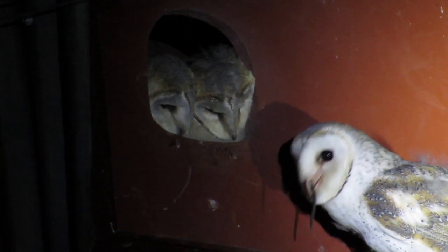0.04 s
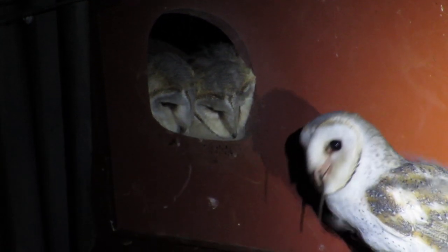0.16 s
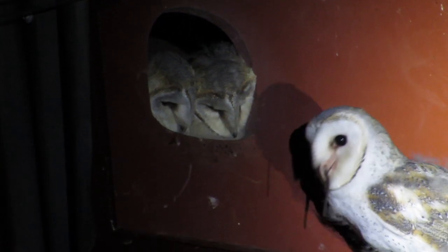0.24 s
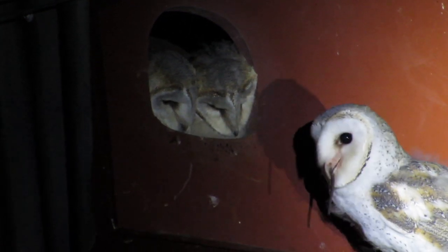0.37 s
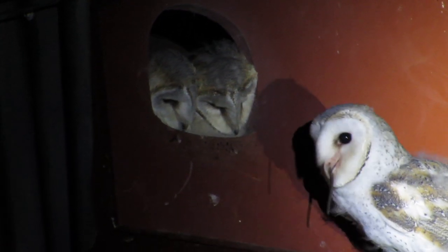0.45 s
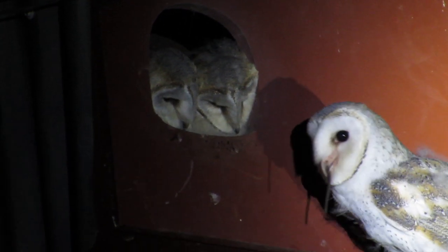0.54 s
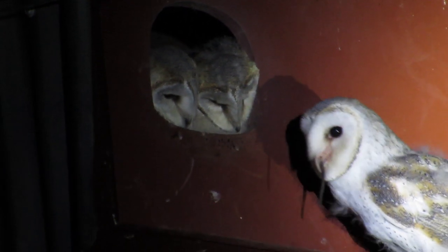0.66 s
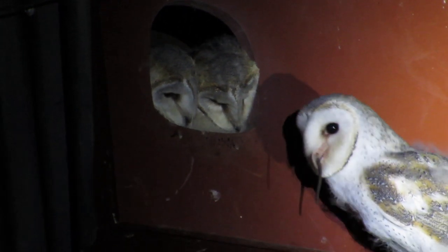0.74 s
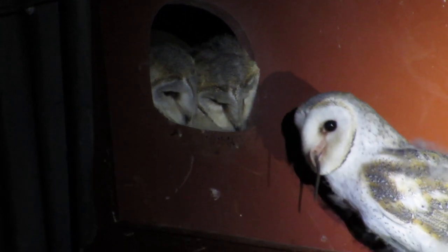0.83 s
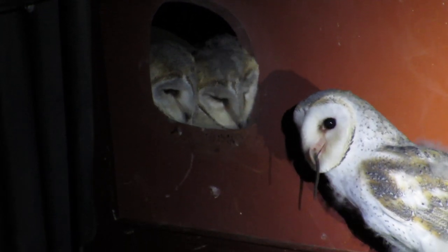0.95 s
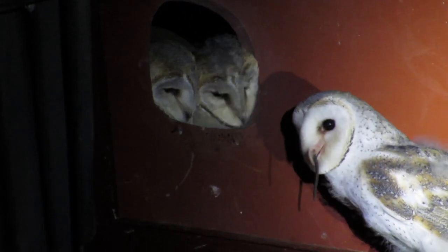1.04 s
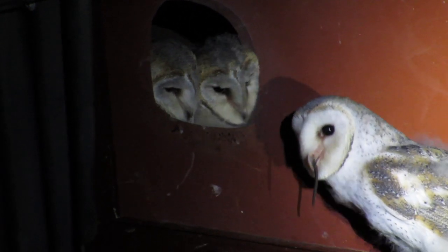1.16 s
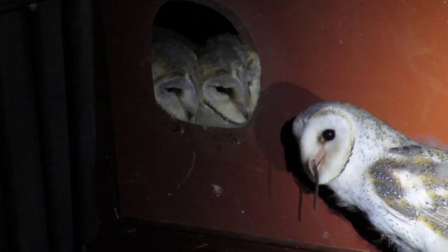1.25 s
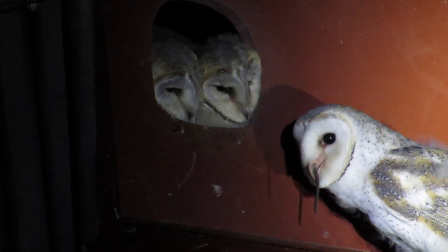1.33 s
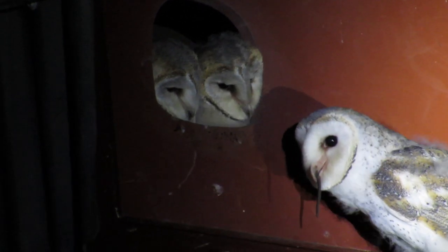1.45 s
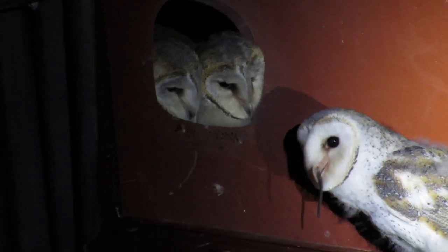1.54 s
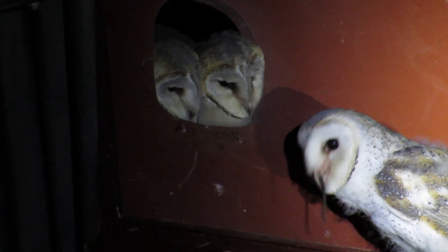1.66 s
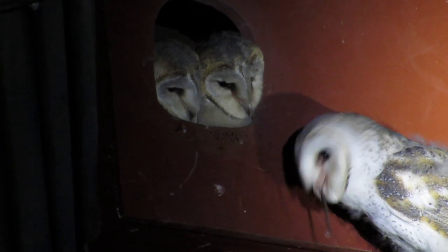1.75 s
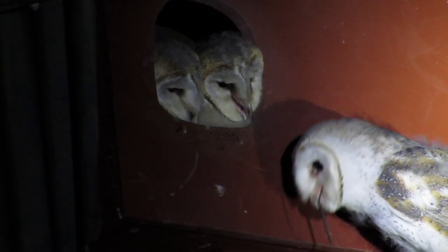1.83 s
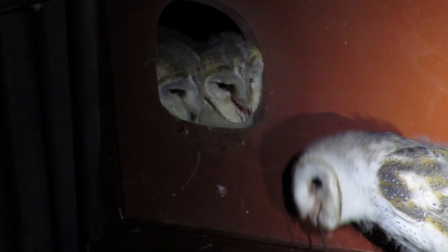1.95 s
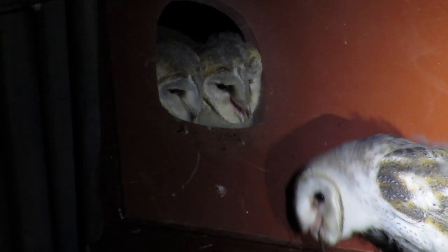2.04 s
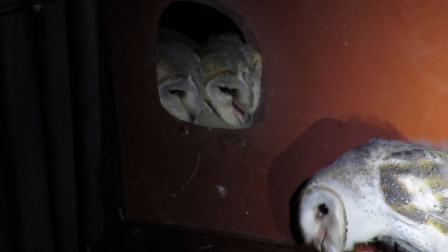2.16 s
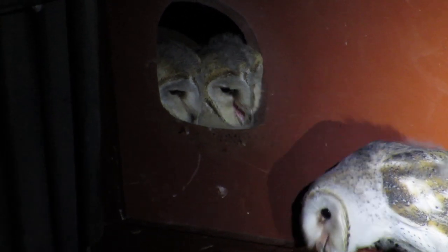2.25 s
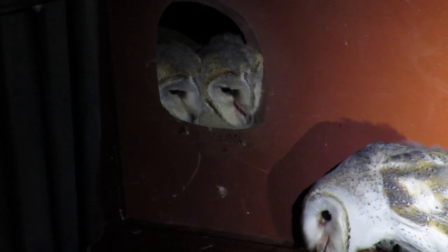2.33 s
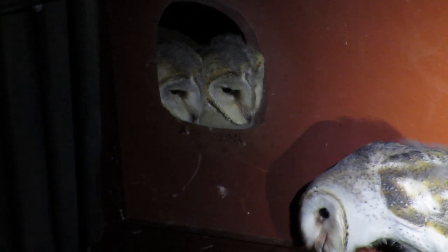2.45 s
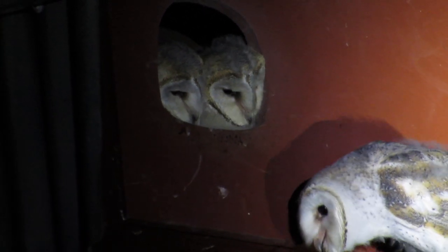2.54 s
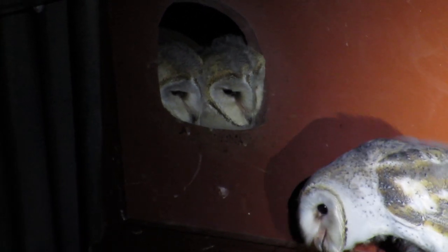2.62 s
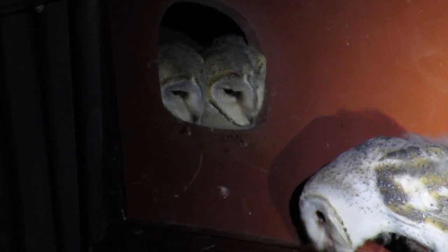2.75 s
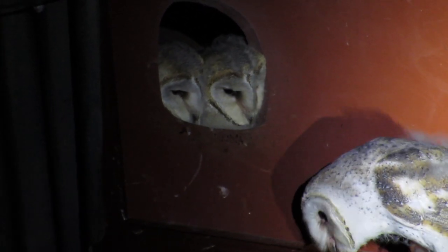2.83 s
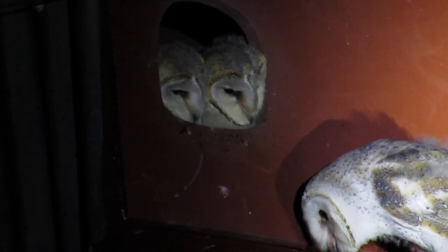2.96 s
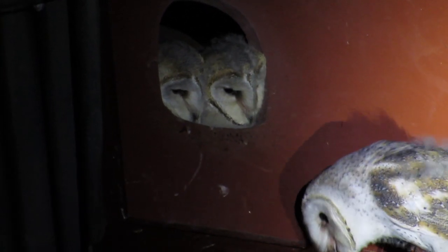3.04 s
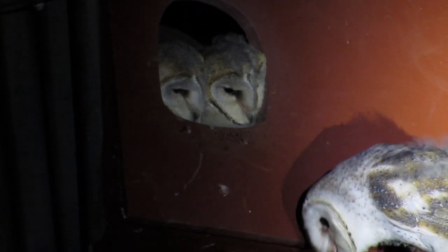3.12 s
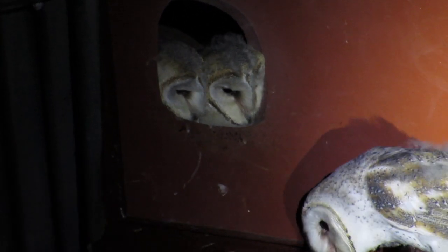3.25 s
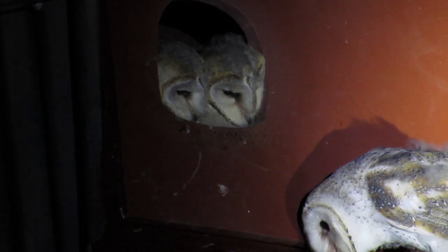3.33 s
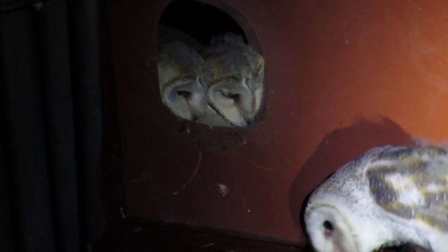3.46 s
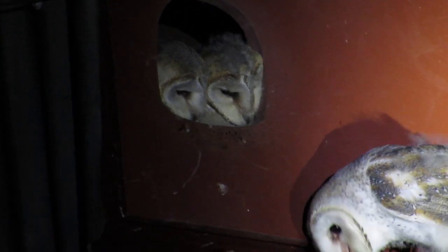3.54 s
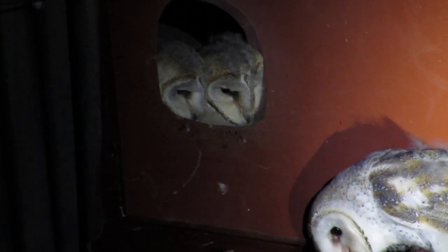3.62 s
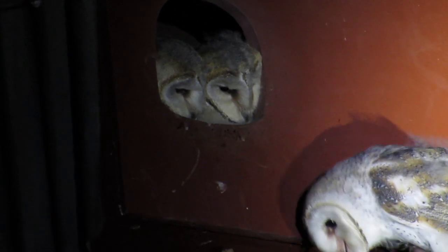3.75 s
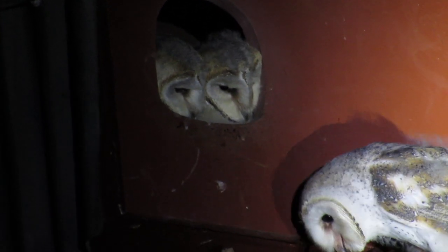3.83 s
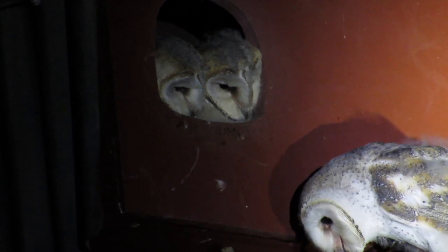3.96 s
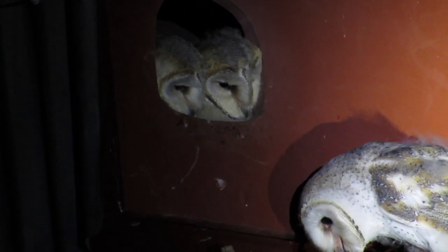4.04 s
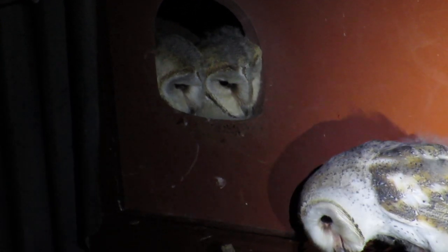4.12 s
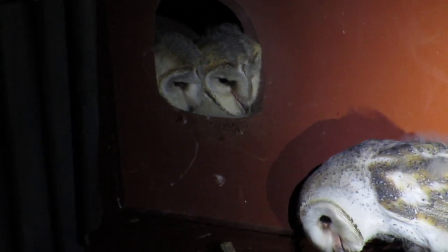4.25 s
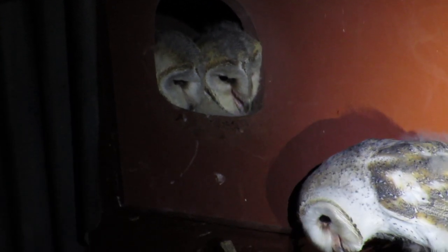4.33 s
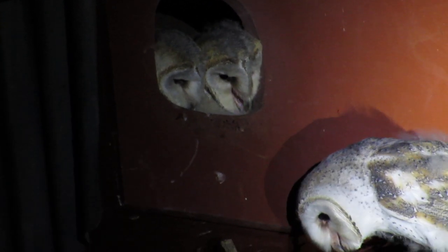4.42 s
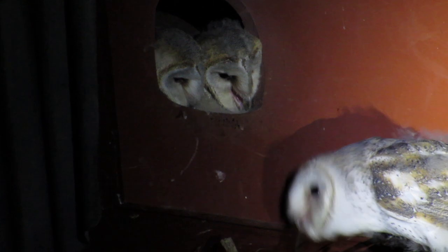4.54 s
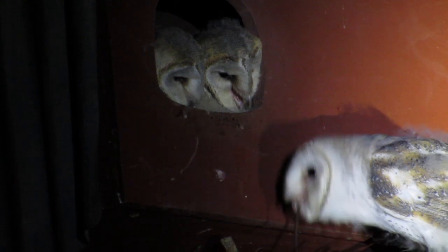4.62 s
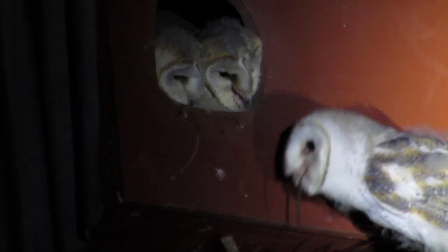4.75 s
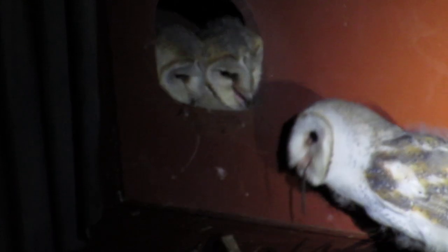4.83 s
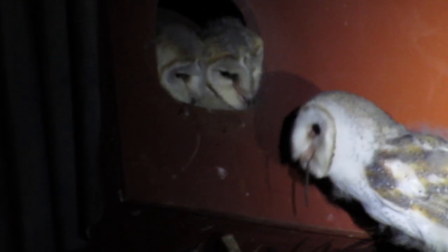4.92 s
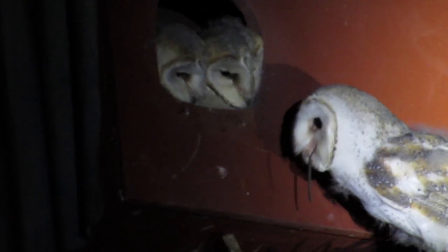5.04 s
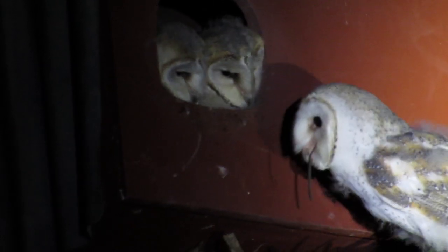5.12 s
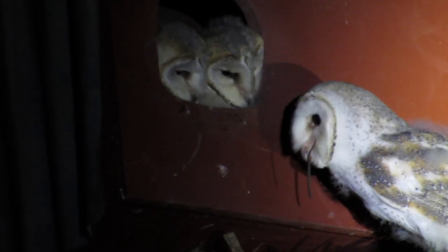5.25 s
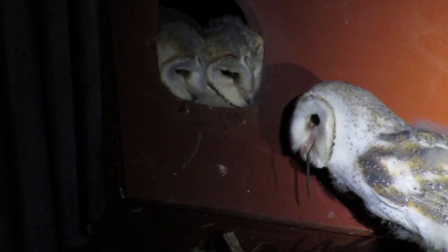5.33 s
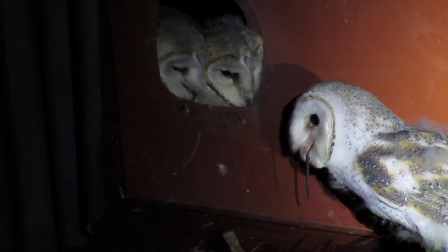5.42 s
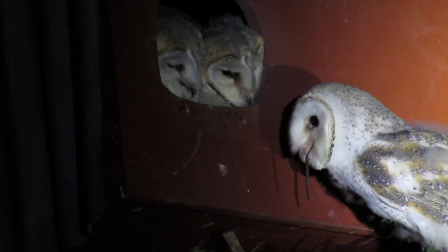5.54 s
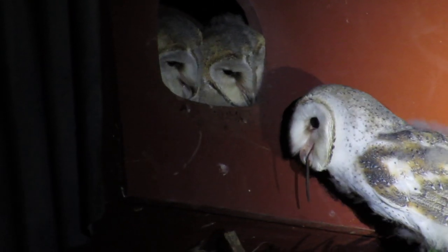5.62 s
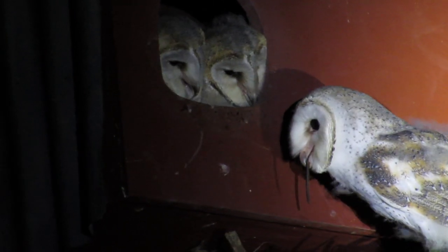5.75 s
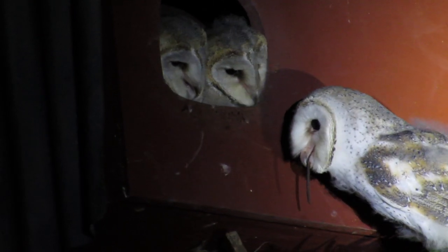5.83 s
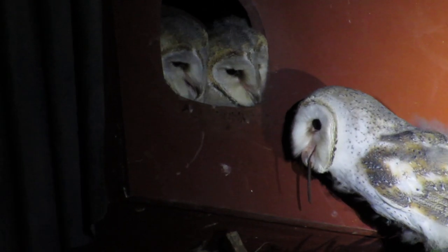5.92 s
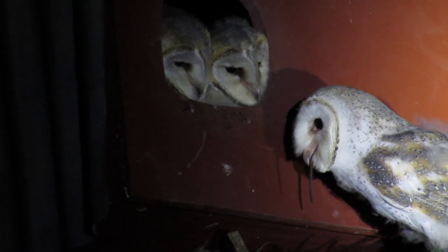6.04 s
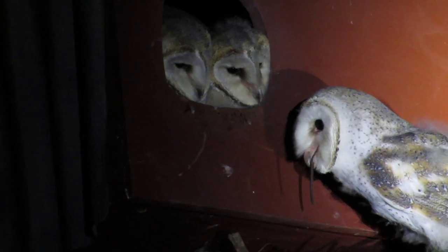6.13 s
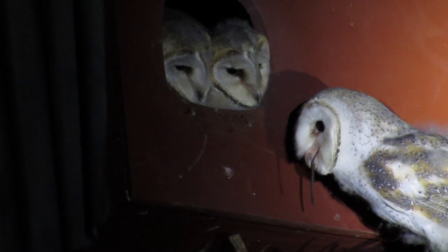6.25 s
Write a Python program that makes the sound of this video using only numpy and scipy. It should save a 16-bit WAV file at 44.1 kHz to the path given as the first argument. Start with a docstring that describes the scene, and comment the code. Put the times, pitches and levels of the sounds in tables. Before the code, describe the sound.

A young barn owl gives two long, harsh, hissing begging screeches from a wooden nest box while crickets chirp steadily through the quiet night.

```python
"""A young barn owl gives two long begging screeches from the hole of a wooden nest box at night.
Each is turbulent air hissing through a throat whose resonances rise as the beak opens.
Crickets chirp as sagging tones and an insect trills thinly, over low rumble and faint hiss.
The box thumps softly, as wavering low tones, and ticks, as decaying bursts, while the birds shift about."""
import sys
import numpy as np
from scipy import signal
from scipy.fft import rfft, irfft
from scipy.io import wavfile

SR = 44100
rng = np.random.default_rng(int(sys.argv[2]) if len(sys.argv) > 2 else 0)


def unload_wav(signal):
    """Save mono or channel-first audio to the path in sys.argv[1] as 16-bit WAV at rate SR, clipped to [-1, 1]."""
    wavfile.write(
        sys.argv[1],
        SR,
        np.round(np.clip(np.atleast_2d(signal).T, -1, 1) * 32767).astype(np.int16),
    )


N = 276948
TIME = np.arange(N) / SR

# Reverberation of the yard. Each row: frequency in Hz, time to decay by 60 dB in seconds.
YARD_T60 = [(300, 0.287), (2500, 0.44), (4000, 0.15), (8000, 0.14), (14000, 0.107)]

# Effort is one arch: a quick start, a long swell to its crest (share of the length),
# a shorter fade, a sharp stop.
ATTACK_S, SWELL_DB, CREST, FADE_DB, STOP_DB_PER_S = 0.023, 19, 0.64, 9, 527
# The beak opens smoothly just after the start, droops (share of the opening) as effort fades,
# then snaps shut.
BEAK_WAIT_S, BEAK_OPEN_S, BEAK_DROOP, BEAK_SHUT_S = 0.017, 0.38, 0.13, 0.048
OVERTONE_DB = -19  # second harmonic of a cricket's stroke, relative to the first
STROKE_S, FULL_PACE_PER_S = 0.033, 28  # length of one near-cricket stroke at full pace
STRETCH = 0.78  # slower strokes last longer, by this power of the pace
# A bout reaches its level within a few strokes; each stroke differs a little.
WARM_UP_STROKES, UNEVEN_DB = 1.35, 0.94
# Each trill run fades in, grows steadily louder and fades out.
TRILL_S, TRILL_FADE_S, TRILL_SWELL_DB_PER_S = 1.8, 0.087, 4
EDGE_HZ = 15400  # upper band limit


def gain_of(db):
    """Level law: decibels to amplitude ratio."""
    return 10 ** (np.asarray(db) / 20)


def evened(x):
    """Normalisation of power: scales to rms 1."""
    return x / np.sqrt(np.mean(x ** 2) + 1e-20)


def read(points, hz):
    """Linear interpolation of a table over a log-frequency axis."""
    f, value = np.transpose(points)
    return np.interp(np.log(hz + 1), np.log(f + 1), value)


def add(mix, s, sound):
    """Superposition: adds a sound to the mix from time s."""
    part = mix[max(round(s * SR), 0):][:len(sound)]
    part += sound[:len(part)]


def coloured(x, spectrum):
    """Linear filtering: multiplies the spectrum by a table of (Hz, dB)."""
    hz = np.fft.rfftfreq(N, 1 / SR)
    return irfft(rfft(x) * gain_of(read(spectrum, hz)), N)


def wobble(hz, size=N):
    """Low-pass noise: random motion of rms 1, no faster than about hz."""
    f = np.fft.rfftfreq(size, 1 / SR)
    spectrum = rfft(rng.standard_normal(size)) / (1 + (f / hz) ** 4)
    return evened(irfft(spectrum, size))


def placed(x, lag, balance_db):
    """Time and level differences: the left microphone hears lag seconds later, balance_db louder."""
    delay = np.exp(-2j * np.pi * np.fft.rfftfreq(N, 1 / SR) * lag)
    late = irfft(rfft(x) * delay, N)
    return np.array([late * gain_of(balance_db / 2), x * gain_of(-balance_db / 2)])


def echo(x, t60, gap=.004, size=22050):
    """Diffuse reverberation: independent noise at each microphone, dying by a table of (Hz, s)."""
    hz, t, z = signal.stft(rng.standard_normal((2, size)), SR, nperseg=256)
    life = read(t60, hz)[:, None]
    decaying = z * gain_of(-60 * t / life) / np.sqrt(life)
    tail = signal.istft(decaying, SR, nperseg=256)[1]
    tail[:, :round(gap * SR)] = 0
    return signal.fftconvolve(x[None], tail / np.linalg.norm(tail[0]), axes=1)[:, :N]


def night(level_db=-66.0, hiss_db=-68.5):
    """Coherence of steady noise: low rumble is largely common to both microphones, hiss is not."""
    # Low rumble of the night air. Each row: frequency in Hz, relative level in dB per Hz.
    rumble_spectrum = [(15, -22.5), (40, -5), (70, 2), (130, -7), (300, -13), (700, -19.5), (2000, -25.5),
                       (3000, -25.5), (4400, -31), (15500, -50)]
    # Left-right likeness of the air. Each row: frequency in Hz, correlation from 0 to 1.
    likeness = [(60, 0.92), (130, 0.74), (300, 0.45), (640, 0), (15000, 0.0045)]
    # Faint, even high hiss. Each row: frequency in Hz, relative level in dB per Hz.
    hiss_spectrum = [(3000, -30), (6200, -16), (8500, -5), (10300, 0), (11700, -7), (13000, -6),
                     (15500, -14)]
    a, b = rfft(rng.standard_normal((2, N)))
    same = np.clip(read(likeness, np.fft.rfftfreq(N, 1 / SR)), -1, 1)
    air = irfft(np.array([a, same * a + np.sqrt(1 - same ** 2) * b]), N)
    rumble = evened(coloured(air, rumble_spectrum))
    hiss = evened(coloured(rng.standard_normal((2, N)), hiss_spectrum))
    return gain_of(level_db) * rumble + gain_of(hiss_db) * hiss


def stroke(length, top_hz, sag, edge=0.78):
    """Stridulation: the scraper slows along the file, so the tone sags towards the stroke's end."""
    u = np.linspace(0, 1, round(length * SR))
    start_hz = top_hz * (1 + 0.0047 * rng.standard_normal())
    turns = np.cumsum(start_hz * (1 - sag * u ** 1.99)) / SR
    swell = signal.windows.tukey(len(u), np.clip(edge, 0, 1)) * (0.61 + .5 * u)
    overtone = gain_of(OVERTONE_DB) * np.sin(2 * np.pi * 2 * turns)
    return np.sqrt(2) * swell * (np.sin(2 * np.pi * turns) + overtone)


def far_crickets(spread=.05):
    """Incoherent sum: a chorus of crickets, each at its own pitch and pace, blurred by distance."""
    # Each row: base pitch in Hz, level in dB, base rate in strokes a second, number of crickets,
    # rms swell in dB.
    choruses = [(3608, -65.5, 29, 7, 1), (3880, -68, 27, 1, 4.5), (5030, -79.5, 22, 5, 3),
                (8200, -83.5, 34, 2, 0)]
    out = np.zeros((2, N))
    for hz, db, rate, count, swell_db in choruses:
        chorus = np.zeros(N)
        for detune in np.linspace(-spread, spread, round(count) + 2)[1:-1]:
            pace = rate * rng.uniform(0.78, 1.4) * (1 + 0.1 * wobble(8))
            beats = np.cumsum(pace) / SR + rng.random()
            starts = np.diff(np.floor(beats), append=np.floor(beats[-1]))  # one impulse a stroke
            one_stroke = stroke(0.0256, top_hz=hz * (1.025 + detune), sag=0.077)
            chorus += signal.oaconvolve(starts, one_stroke)[:N]
        chorus *= gain_of(swell_db * wobble(3.9))
        scattered = echo(chorus, [(3000, 0.066), (8000, 0.016)])
        direct = 0.59 * placed(chorus, lag=0.0002, balance_db=-8.0)
        out += gain_of(db) * evened(scattered + direct)
    return out


def near_crickets(high_length=0.049, grass_db=-10.5, scrape=0.13):
    """Direct and scattered sound: a close cricket's bouts and a higher one's strokes among plants."""
    # Bouts of the nearest cricket, at full or half pace. Each row: middle of the first stroke in
    # seconds, strokes, strokes a second, level in dB, how much softer the first stroke is in dB.
    bouts = [(0.019, 9, 28.5, -51, -0.5), (0.393, 4, 28, -60.5, 2), (0.554, 10, 27.4, -50.5, 6.5),
             (1.044, 3, 31, -58, 8), (1.181, 7, 14.9, -50.5, 5.5), (1.647, 3, 27.5, -51.5, 2),
             (2.425, 4, 26.6, -48.5, -2), (2.648, 14, 27.9, -49, 13.5), (3.15, 2, 29, -61, -0.5),
             (3.313, 16, 28, -54, 0.5), (4.048, 5, 13.9, -49.5, 8.5), (5.044, 7, 26.95, -46.5, -2.5),
             (5.466, 13, 28.3, -45.5, 6.5), (6.099, 6, 28.5, -45, 3)]
    # Strokes of a higher-pitched cricket. Each row: middle in seconds, level in dB.
    high_chirps = [(0.4, -61), (0.499, -61), (0.759, -58), (1.512, -59), (1.61, -59), (2.611, -62.5),
                   (2.711, -63), (2.967, -63)]
    low, high = np.zeros((2, N))
    for first, strokes, rate, db, softer_db in bouts:
        length = STROKE_S * (FULL_PACE_PER_S / rate) ** STRETCH
        slow = length / STROKE_S - 1  # a long stroke starts higher and sags further
        for k in range(round(strokes)):
            warm_up_db = -softer_db * np.exp(-k / WARM_UP_STROKES)
            level = gain_of(db + warm_up_db + UNEVEN_DB * rng.standard_normal())
            tone = stroke(length, top_hz=4063 + 50 * slow, sag=0.0937 + .05 * slow)
            add(low, first + k / rate - length / 2, level * tone)
    for s, db in high_chirps:
        add(high, s - high_length / 2, gain_of(db) * stroke(high_length, top_hz=5156, sag=0.069))
    low *= 1 + scrape * wobble(200)
    direct = placed(low, lag=0.000054, balance_db=-0.1) + placed(high, lag=.00001, balance_db=0.5)
    return direct + gain_of(grass_db) * echo(low + high, [(4000, 0.33), (8000, 0.1)])


def trill(rate_hz=85, width_hz=60, drift_hz=35):
    """Pulsed resonance: rapid, short strokes excite one narrow wing resonance."""
    # Runs of a fast, thin insect trill. Each row: start in seconds, level in dB before the fades
    # and the swell, centre pitch in Hz.
    runs = [(0.35, -80.5, 7330), (3.0, -74, 7320), (5.85, -79.5, 7238)]
    beats = np.cumsum(rate_hz * (1 + .01 * wobble(2.9))) / SR
    gate = np.maximum(np.sin(2 * np.pi * beats) + 0.54, 0)
    out = np.zeros(N)
    for start, db, hz in runs:
        age = np.clip(TIME - start, 0, TRILL_S)
        fades = np.clip(np.minimum(age, TRILL_S - age) / TRILL_FADE_S, 0, 1)
        level = fades * gain_of(db + TRILL_SWELL_DB_PER_S * age)
        pitch = hz + drift_hz * wobble(1.0) + width_hz * wobble(470)  # fast wobble widens the line
        tone = np.sin(2 * np.pi * np.cumsum(pitch) / SR)
        out += level * evened(gate * tone)
    return placed(out, lag=.00001, balance_db=-1.0)


def effort(age, length):
    """Amplitude envelope: push of air, 0-1, at each moment of a screech."""
    u = np.clip(age / length, 0, 1)
    swell_db = SWELL_DB * (1 - u / CREST) ** 2
    fade_db = FADE_DB * ((u - CREST) / (1 - CREST)) ** 2
    arch_db = np.where(u < CREST, swell_db, fade_db)
    stop_db = STOP_DB_PER_S * np.maximum(age - length, 0)
    return np.clip(age / ATTACK_S, 0, 1) * gain_of(-arch_db - stop_db)


def beak_opening(age, length):
    """Articulation: opening of the beak, 0-1, at each moment of a screech."""
    opening = np.sin(np.pi / 2 * np.clip((age - BEAK_WAIT_S) / BEAK_OPEN_S, 0, 1))
    fading = np.clip((age / length - CREST) / (1 - CREST), 0, 1)
    shutting = np.maximum(age - length, 0) / BEAK_SHUT_S
    return np.clip(opening - BEAK_DROOP * fading ** 2 - shutting, 0, 1)


def screech(start, length, peak_db, rasp=0.029, rasp_hz=330, size=512):
    """Source and filter: sputtering air excites throat resonances that rise as the beak opens."""
    # Throat resonances. Each row: frequency in Hz with the beak nearly shut, frequency in Hz wide
    # open, width in Hz, relative level in dB nearly shut, relative level in dB wide open.
    resonances = [(2710, 3628, 368, 0, 2), (3850, 4200, 480, -7, -7), (4690, 5140, 910, 1, 0),
                  (4900, 5834, 530, 8.5, 5.5), (5870, 6350, 960, 4, -6.5), (7100, 7660, 2100, -1, -11),
                  (9100, 9250, 3130, -8.5, -6), (10100, 12020, 940, -16, -7.5),
                  (12600, 12970, 530, -20, -11.5)]
    # Steady colour of the box's opening. Each row: frequency in Hz, gain in dB.
    hole_colour = [(2500, -4), (2900, 1), (3300, -1), (3530, 1), (4000, -2), (4950, .5), (5400, -1),
                   (5750, 1.5), (7700, 1), (7950, -5), (8600, 1), (9700, 2), (10300, -5), (10700, 1),
                   (11100, -3), (11600, 2), (14200, 0), (15000, -16)]
    overlap = size * 3 // 4
    air = rng.standard_normal(N) * np.exp(rasp * wobble(rasp_hz))
    hz, t, z = signal.stft(air, SR, nperseg=size, noverlap=overlap)
    hz, beak, power = hz[:, None], beak_opening(t - start, length), 0
    for shut_hz, open_hz, width, shut_db, open_db in resonances:
        centre = shut_hz + beak * (open_hz - shut_hz)
        db = shut_db + beak * (open_db - shut_db)
        power = power + gain_of(db) ** 2 / (1 + (2 * (hz - centre) / width) ** 2) ** 2
    low_cut = 1 + (2500 / (hz + 1)) ** 12
    throat = np.sqrt(power / low_cut) * gain_of(read(hole_colour, hz))
    shaped = z * throat / np.linalg.norm(throat, axis=0)  # equal power at every opening
    hiss = signal.istft(shaped, SR, nperseg=size, noverlap=overlap)[1][:N]
    return evened(hiss) * gain_of(peak_db) * effort(TIME - start, length)


def hollow_wash(start, length, follow=0.73, lead=0.061, linger=0.041, flicker_db=1.6, balance_db=1.0):
    """Energy storage: a dull rush of air in the box starts just before the hiss and outlasts it."""
    # Each row: frequency in Hz, relative level in dB per Hz.
    wash_spectrum = [(30, -10), (100, -3.5), (400, -6.5), (780, -1.5), (950, -9.5), (1200, -20.5),
                     (1700, -11.5), (1950, -2.5), (2200, 0.5), (2600, -10), (3500, -2.5), (6000, -18)]
    flow = effort(TIME - start + lead, length) ** follow
    keep = np.exp(-1 / (linger * SR))
    stored = np.sqrt(signal.lfilter([1 - keep], [1, -keep], flow ** 2))
    sides = gain_of([[balance_db / 2], [-balance_db / 2]])
    rush = evened(coloured(rng.standard_normal((2, N)), wash_spectrum))
    return sides * stored * gain_of(flicker_db * wobble(20)) * rush


def owl(walls_db=-8, yard_db=-22, hollow_db=-49):
    """Multipath: the hiss comes straight out of the hole, off the near boards and from the yard."""
    # Each row: start in seconds, length in seconds, level at full effort in dB.
    screeches = [(1.685, 0.71, -25), (4.314, 0.71, -25.0)]
    # Reflections from nearby boards. Each row: delay in seconds, amplitude gain left, gain right.
    boards = [(.00254, -0.15, -0.034), (.00467, -0.23, -0.41), (.00497, -0.13, -0.12), (.00768, 0.43, 0.17),
              (.00883, -.13, -.05), (.01005, 0.18, 0.18), (.0203, 0.013, 0.1)]
    hiss = sum(screech(*row) for row in screeches)
    out = placed(hiss, lag=-0.000013, balance_db=0.66)
    for delay, *gains in boards:
        for ear, gain in zip(out, gains):
            add(ear, delay, gain * hiss)
    # Short waves scatter most.
    treble = coloured(hiss, [(3000, -12), (5800, -5.0), (8000, 2.5), (12000, 4.0)])
    out += gain_of(walls_db) * echo(treble, [(3000, 0.066), (12000, 0.11)])
    out += gain_of(yard_db) * echo(hiss, YARD_T60)
    wash = sum(hollow_wash(start, length) for start, length, _ in screeches)
    return out + gain_of(hollow_db) * wash


def box_knocks(thump_hz=48, tick_t60=0.065, tick_width_hz=260):
    """Impulsive excitation: shifting birds push the panels with dull thumps and make dry ticks."""
    # Soft thumps on the box. Each row: start in seconds, level in dB, length in seconds.
    thump_rows = [(2.568, -58, 0.071), (2.678, -61, 0.075), (2.836, -51.5, 0.076), (2.877, -52, 0.076),
                  (3.2, -63, 0.16), (3.801, -52, 0.054)]
    # Small ticks. Each row: start in seconds, level in dB before the decay, centre pitch in Hz.
    tick_rows = [(4.044, -66, 1060), (4.476, -54.5, 1150), (5.132, -61, 1464), (5.596, -61, 1690),
                 (5.723, -59, 1033)]
    thumps, ticks = np.zeros((2, N))
    for s, db, length in thump_rows:
        u = np.linspace(0, 1, round(length * SR))
        turns = np.cumsum(thump_hz * (1 + 0.27 * wobble(60, size=len(u)))) / SR
        push = np.sin(np.pi * np.sqrt(u)) * signal.windows.tukey(len(u), .5)
        add(thumps, s, gain_of(db) * np.sqrt(2) * push * np.sin(2 * np.pi * turns))
    t = TIME[:4096]
    for s, db, hz in tick_rows:
        ring = wobble(tick_width_hz, size=len(t)) * np.sin(2 * np.pi * hz * t)
        add(ticks, s, gain_of(db - 60 * t / tick_t60) * np.minimum(t / 0.0014, 1) * ring)
    return thumps + ticks + gain_of(-8) * echo(ticks, YARD_T60)


def scene():
    """Superposition of the owl, the insects, the box and the night air."""
    return night() + far_crickets() + near_crickets() + trill() + owl() + box_knocks()


def record(dry):
    """Band limitation: a linear-phase low-pass filter removes the extreme treble."""
    low_pass = signal.firwin(511, EDGE_HZ, window=("kaiser", 9), fs=SR)
    return signal.oaconvolve(dry, low_pass[None], "same")


dry = scene()
out = record(dry)
unload_wav(out)
```